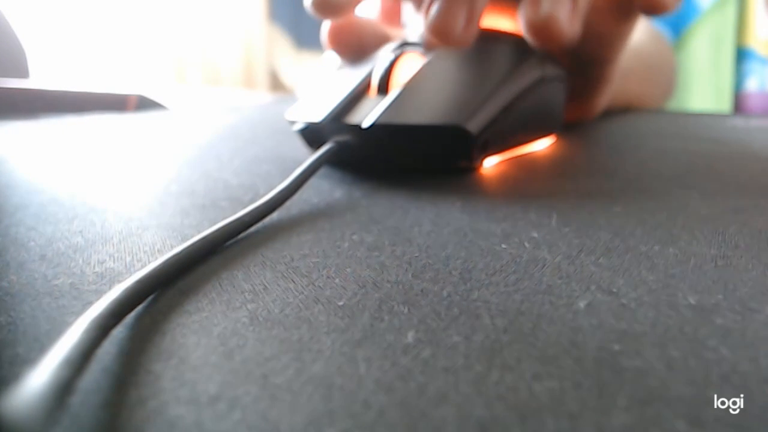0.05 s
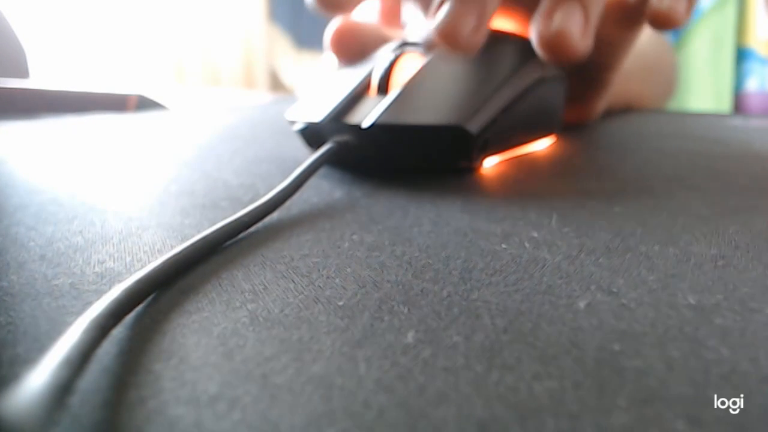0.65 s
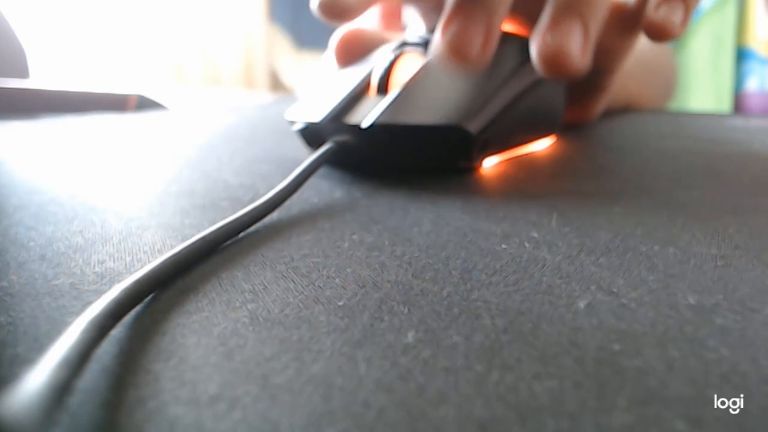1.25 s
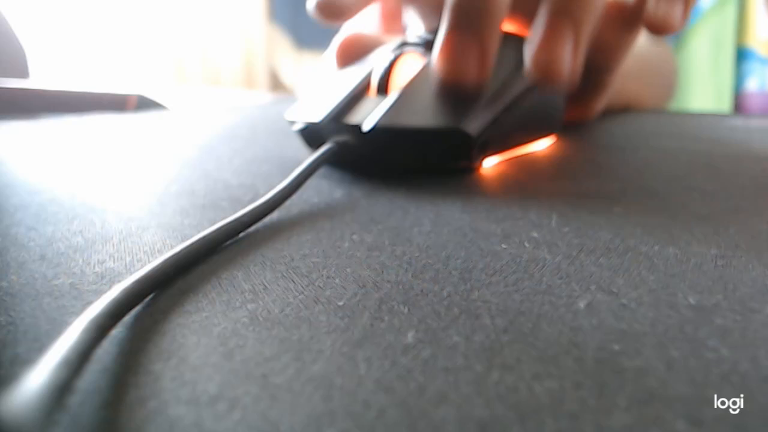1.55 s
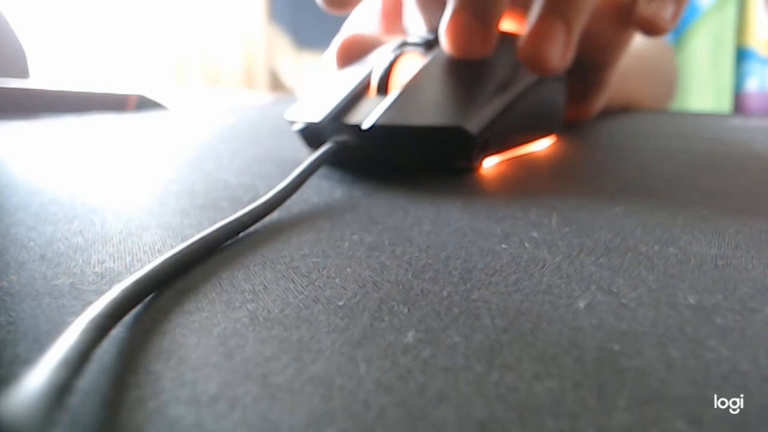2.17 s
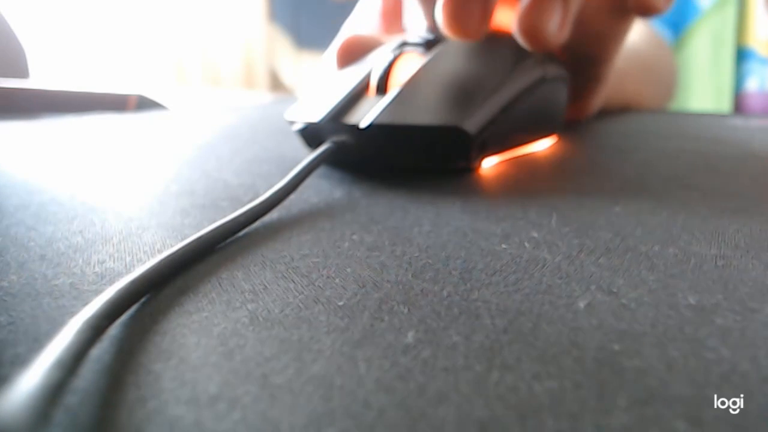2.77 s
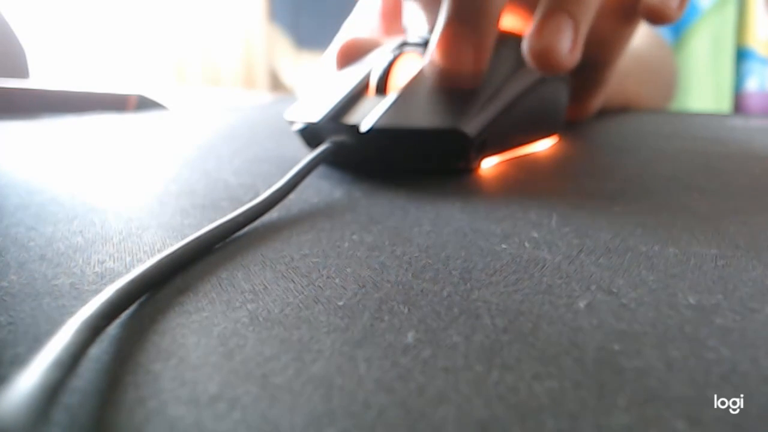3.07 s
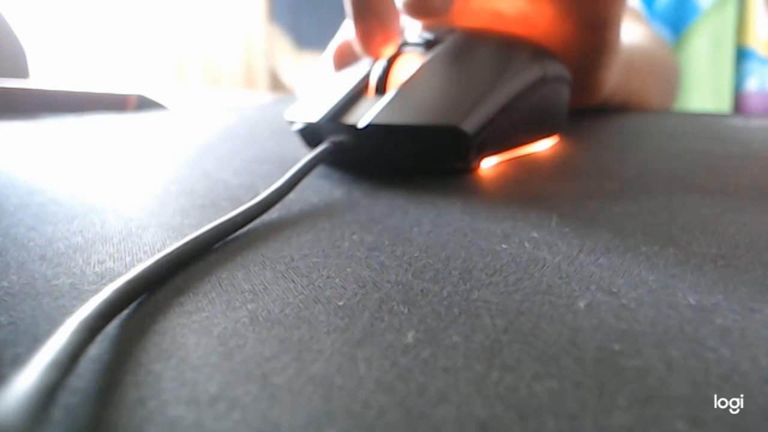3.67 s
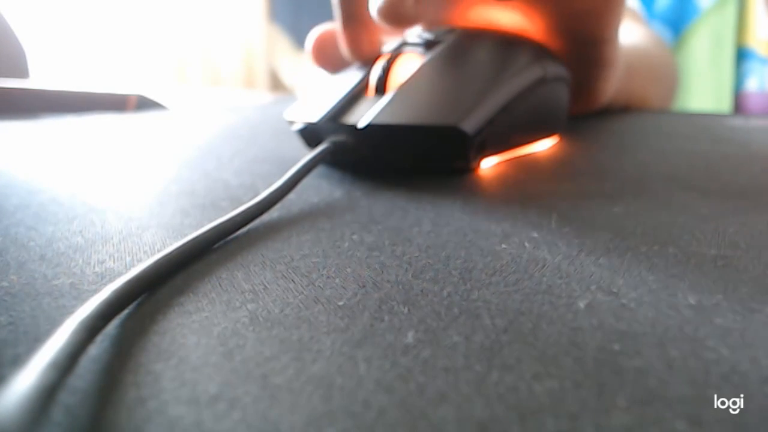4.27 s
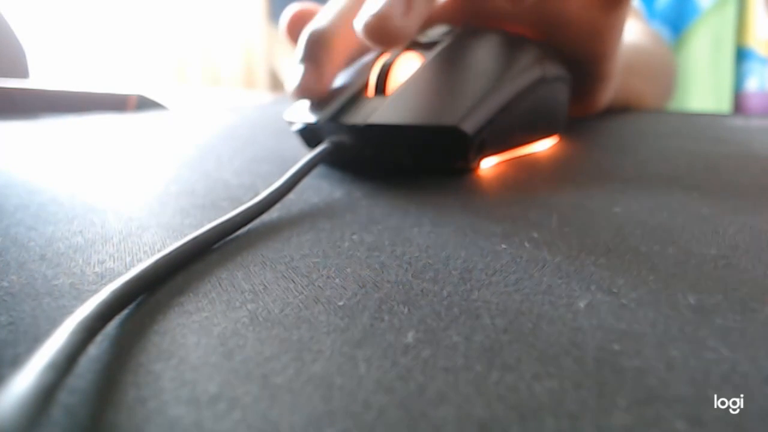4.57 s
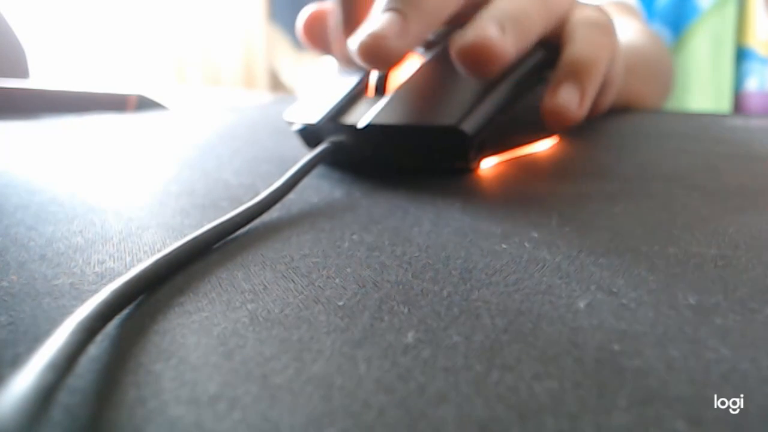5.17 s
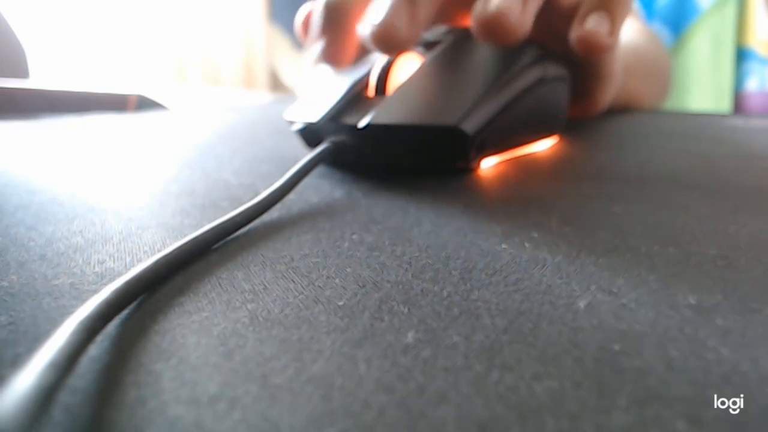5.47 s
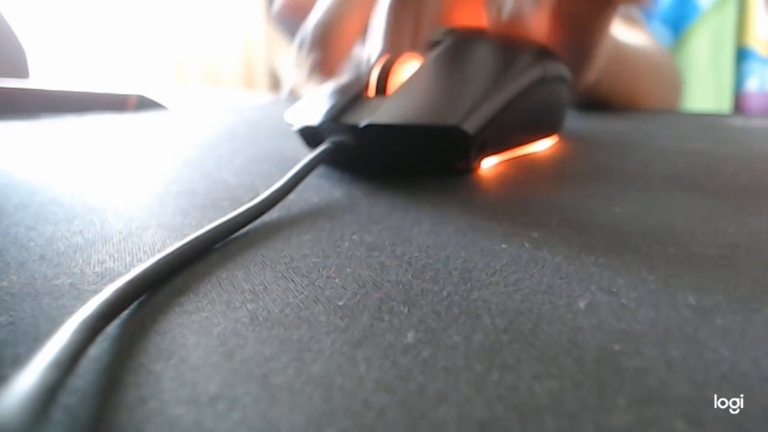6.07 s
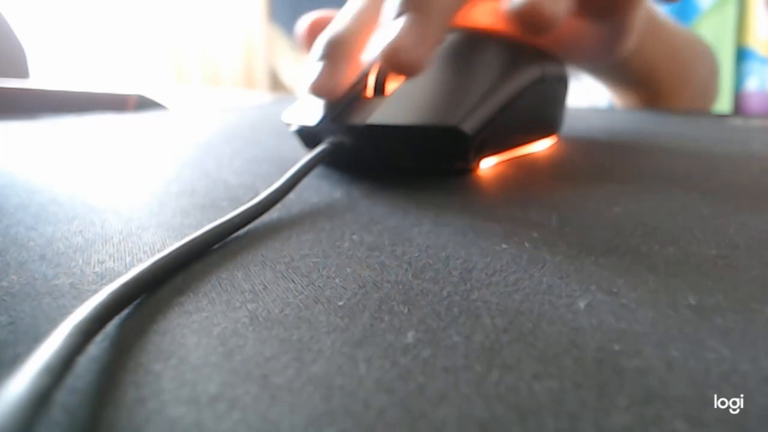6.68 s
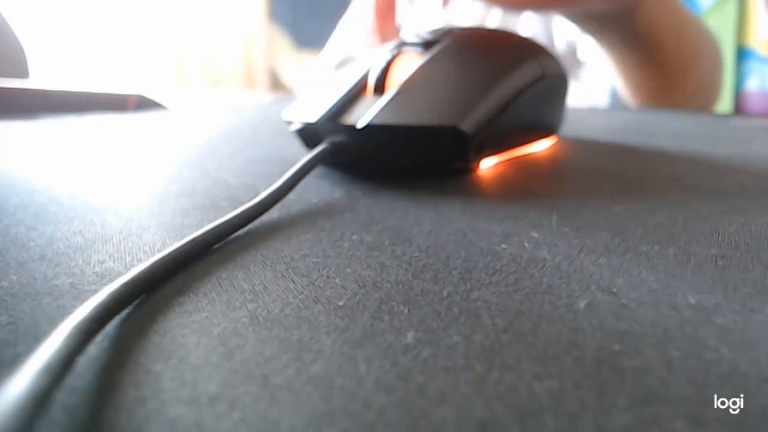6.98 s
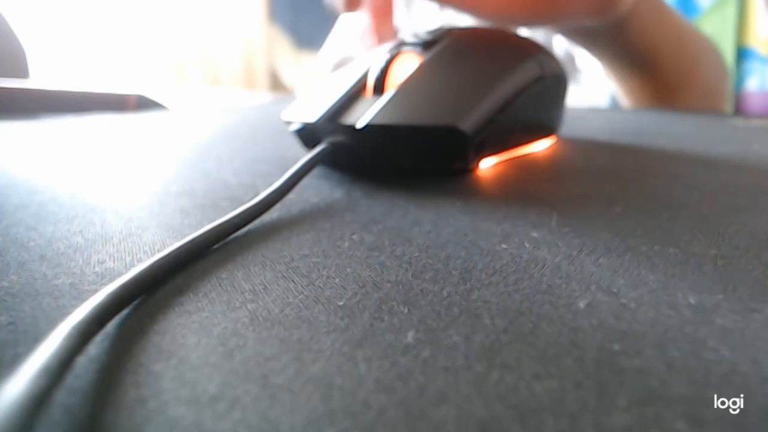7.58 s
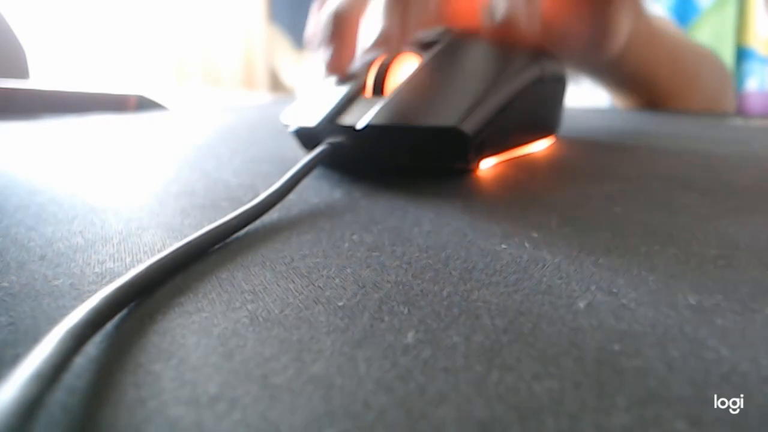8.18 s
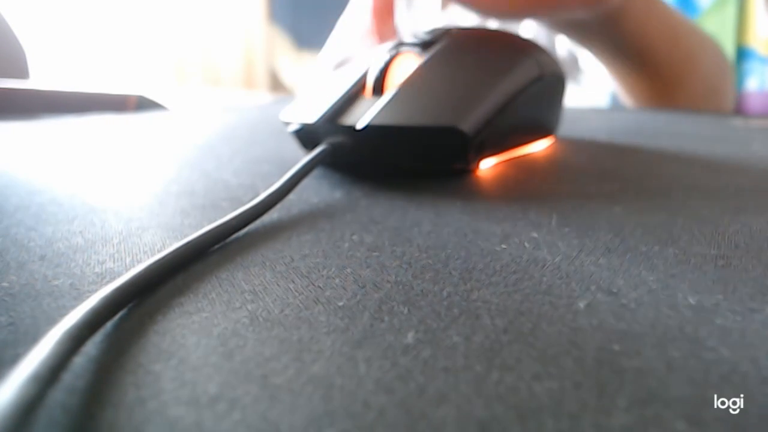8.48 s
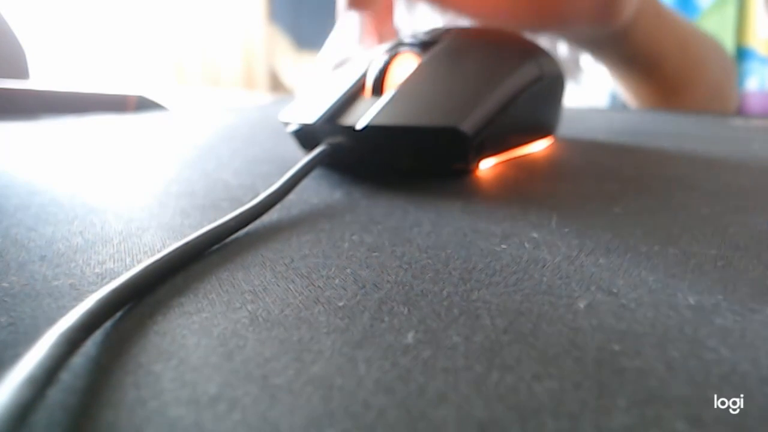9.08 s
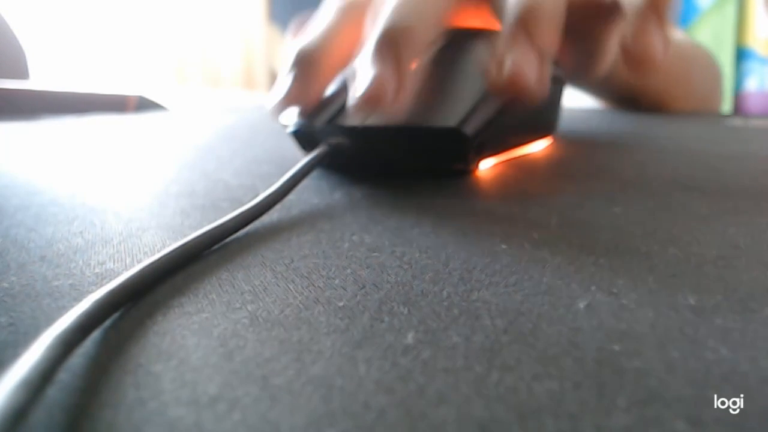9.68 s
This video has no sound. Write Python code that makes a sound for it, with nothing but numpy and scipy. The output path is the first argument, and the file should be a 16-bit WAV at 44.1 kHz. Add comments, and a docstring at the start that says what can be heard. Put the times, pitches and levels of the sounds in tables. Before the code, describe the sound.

A computer mouse is clicked on a padded desk, close to the microphone, over the faint hum of a small room. Each burst lasts about a tenth to a quarter of a second: a light switch click, a few hard plastic clacks with dull desk thumps, the stutter of a dragging fingertip, then the button springing back. Bursts come at about 0.3, 0.9, 1.5, 2.3 and 3 seconds, the last two the loudest. The tone then shifts slightly on the other button, with softer bursts at 3.8 and 4.4 seconds and only light ticks and a low finger rub near 5.1. A strong burst at 6 seconds starts a steadier run, at roughly 6.5, 7.1, 8.1, 8.6, 9.1 and 9.5, with soft taps around 7.7. Between bursts, skin faintly brushes the plastic and the desk rumbles softly. The clicking ends near 9.7 seconds.

```python
"""A small room hums quietly; then fingers work the buttons of a computer mouse on a padded desk.
In a typical burst a light press trips the switch, a few hard blows land, the finger sticks and slips,
and the button springs back. Each contact excites the modes of desk, body, shell, switch and spring.
Between bursts skin brushes the plastic and the arm makes the desk rumble. At 3.4 s the hand moves to
the second button, which favours other resonances; the last of sixteen bursts ends near 9.7 s."""
import sys
import numpy as np
from scipy import signal
from scipy.fft import rfft, irfft, next_fast_len
from scipy.io import wavfile
from scipy.ndimage import uniform_filter1d, map_coordinates

SR = 44100
rng = np.random.default_rng(int(sys.argv[2]) if len(sys.argv) > 2 else 0)


def log_audio(samples):
    """Write samples as a 16-bit WAV file to the path given in sys.argv[1]."""
    # one column per channel
    frames = np.atleast_2d(samples).T
    # limit to full scale, then quantise
    limited = np.clip(frames, -1, 1)
    pcm = np.round(limited * 32767).astype(np.int16)
    wavfile.write(sys.argv[1], SR, pcm)


N = 438354
THUD_T, CLICK_T = np.arange(SR // 5) / SR, np.arange(SR // 10) / SR  # time axes, t/s
BUTTON_CHANGE_S, SECOND_KNOCK_DB = 3.4, 7  # the second button rocks the body more on slip and release
MEDIUM_CLACK_DB = -28.5

# Spectra of room air, desk rumble, brushing skin and rubbing fingertip: f/Hz, relative density/dB
AIR_SPECTRUM = [(40, -23.5), (80, -9), (114, -3.5), (210, -14), (480, -12), (860, -19.5), (1300, -32.5),
                (2000, -38.5), (4000, -48), (8000, -53.5), (16000, -57.5)]
RUMBLE_SPECTRUM = [(15, -10.5), (30, -9), (52, 8), (72, -12), (110, -1.5), (200, -36), (500, -62.5),
                   (2000, -120)]
BRUSH_SPECTRUM = [(900, -18), (2000, 2), (2900, -11), (4000, 6), (5200, -16.5), (7000, -15), (9000, -22),
                  (16000, -21)]
RUB_SPECTRUM = [(70, -21), (130, -4.5), (190, -21), (255, 5), (380, -15.5), (700, -25), (1300, -39),
                (2400, -41.5), (3200, -47), (8000, -57), (16000, -60.5)]
# The computer's hum and whine: f/Hz, level/dB
HUM_TONES = [(54, -75.5), (108, -76.5), (1200, -90), (1400, -94.5)]
# Reverberation time of the room: f/Hz, T60/s
ROOM_DECAY = [(120, 0.29), (500, 0.48), (1500, 0.21), (4000, 0.28), (12000, 0.093)]
# The arm shifts its weight, the hand brushes the shell, a fingertip rubs: t/s, duration/s, level/dB
ARM_SHIFTS = [(0.02, 0.061, -64), (0.97, .05, -52), (4.2, 0.017, -59), (4.55, 0.32, -67),
              (5.15, 0.1, -63.5), (5.79, .02, -51.5), (6.74, 0.017, -58), (7.28, 0.098, -49),
              (7.62, 0.024, -55.5), (9.59, 0.088, -58.5)]
BRUSHES = [(0.01, .05, -86), (0.53, 0.09, -74), (1.17, 0.072, -78), (1.8, 0.12, -78), (2.59, 0.045, -76.5),
           (3.22, 0.016, -73), (3.95, 0.039, -87), (4.6, 0.054, -84.5), (5.41, 0.11, -67.5)]
RUBS = [(1.14, 0.092, -59.5), (2.41, 0.074, -42.5), (5.08, 0.196, -47.5), (6.55, 0.053, -39)]

# Low modes of the desk and of the mouse body on its pad: f/Hz, relative level/dB, T60/s
DESK_MODES = [(124.1, 11, 0.14), (143, -8, 0.26), (158.54, 0.5, 0.23), (185, -17.5, 0.5)]
BODY_MODES = [(238.3, 5, 0.081), (260.67, 10, 0.083), (291, -3, 0.11), (383, -23.5, 0.19)]
# Resonances of shell, switch housing and leaf spring; each wide last row is the contact's dry crack:
# f/Hz, bandwidth/Hz, relative level/dB, gain in the ring/dB, gain on the second button/dB
SHELL_MODES = [(404, 26, -1, 7, 3), (667, 27, 9.5, -5, 3.5), (793, 69, 0.5, 1, -1), (984, 72, -3, -1, 2),
               (1151, 42, -5.5, 5.5, 1), (1350, 230, -9, 0.5, 1), (1590, 57, -5.5, 6, 1),
               (1680, 130, -4.5, -5, -8), (1815, 44, -1, -6, -1.5), (1916, 32, -6, -6.5, -14),
               (2364, 130, -7.5, 0, 3), (1680, 810, -12, -27.5, -1)]
SWITCH_MODES = [(2990, 180, -4.5, 3, 1), (3717, 270, 5, -2, -6.5), (4030, 330, -5.5, -4.5, -9.5),
                (4566, 200, -6, -0.5, -0.5), (3810, 940, -7.5, -27.5, -2.5)]
SPRING_MODES = [(5343, 520, -0.5, 2.5, -3.5), (5900, 600, 0.5, 0, -3.2), (7130, 320, -2, 5, 0),
                (10910, 1200, -12.5, 7, -2.2), (14700, 1200, -23.5, 0.5, 1.5),
                (6366, 1400, 0.5, -26.5, -8.5)]

# A finger lands hard on a button: t/s, shell clack/dB, desk thump/dB, body knock/dB
BLOWS = [(0.309, -25.5, -22.5, -31), (0.334, -22, -14.5, -32.5), (0.356, -33, -22.5, -27.5),
         (0.385, -30.5, -31, -47.5), (0.898, -39, -32.5, -32.5), (0.926, -24.5, -17, -24.5),
         (0.95, -26.5, -17, -26.5), (0.975, -42.5, -22, -40), (0.997, -33.5, -42, -35.5),
         (1.542, -23.5, -17.5, -24.5), (1.567, -29.5, -19, -29.5), (1.612, -37.5, -41, -33),
         (2.314, -18.5, -15, -16), (2.339, -20, -13, -19.5), (2.359, -35.5, -26, -30.5),
         (3.018, -18.5, -19.5, -17), (3.042, -23, -14, -23), (3.063, -32, -39.5, -34.5),
         (3.108, -35.5, -30, -35.5), (3.787, -34, -23.5, -34.5), (3.815, -35, -58, -34),
         (4.384, -43.5, -28.5, -30.5), (4.433, -38, -30, -36), (4.463, -39, -47, -34.5),
         (6.007, -27.5, -26.5, -25.5), (6.03, -21.5, -13, -22.5), (6.043, -27, -32.5, -25.5),
         (6.056, -32, -15.5, -22.5), (6.497, -38.5, -25, -32), (6.526, -40, -32, -21.5),
         (6.576, -43, -39, -33.5), (7.125, -47.5, -26.5, -29.5), (7.182, -36, -23.5, -29.5),
         (8.099, -33, -18, -26.5), (8.114, -23.5, -28.5, -29), (8.125, -27.5, -15, -25.5),
         (8.663, -27, -34, -22), (9.05, -41, -24.5, -27), (9.125, -28, -35.5, -25.5),
         (9.167, -43.5, -30.5, -33), (9.544, -27, -39, -23.5), (9.571, -30, -19.5, -21.5)]
# Switch snap and spring ping in a blow: level at a medium clack/dB, slope/(dB per dB of clack)
BLOW_RESPONSE = [(-40, 0.74), (-43, .35)]
# The finger drags down the button, sticking and slipping: t/s, duration/s, level/dB
STROKES = [(0.323, .05, -42), (0.915, .07, -43.5), (1.531, .09, -37.5), (2.312, .05, -37),
           (3.032, .075, -39), (3.781, .075, -42), (4.424, .04, -42), (6.052, .03, -41), (6.537, .04, -43),
           (7.162, .03, -42.5), (8.109, .03, -38), (9.103, .06, -40.5), (9.55, .05, -44.5)]
# Light presses that trip the switch, the button springing back, soft touches: t/s, level/dB
PRESSES = [(0.869, -46), (0.893, -37.5), (1.514, -42), (2.19, -44), (2.303, -39), (2.919, -46),
           (3.006, -41.5), (3.724, -46.5), (4.365, -48.5), (5.124, -48), (5.995, -41), (7.136, -42.5),
           (8.068, -48), (8.079, -40.5), (8.574, -50), (8.583, -40), (8.609, -42), (9.027, -44),
           (9.037, -42), (9.527, -44.5)]
RELEASES = [(0.399, -36.5), (0.428, -46.5), (1.04, -38), (1.656, -36.5), (2.494, -37), (5.249, -44.5),
            (6.114, -43), (6.683, -42), (7.287, -43), (8.228, -44.5), (9.218, -42), (9.654, -42.5)]
TOUCHES = [(0.21, -60.5), (0.297, -46.5), (1.075, -40), (1.188, -64), (1.704, -41.5), (3.135, -37.5),
           (3.576, -58.5), (3.716, -43.5), (3.755, -33.5), (5.058, -45), (6.46, -43.5), (6.48, -35.5),
           (7.108, -41.5), (7.589, -45), (7.629, -48), (7.718, -39.5), (8.702, -34.5)]
# Gains by which each kind of contact shares its force: desk/dB, body/dB, shell/dB, switch/dB, spring/dB
SLIP_SHARES = (7.5, 4.5, -2, -4.5, -1)
PRESS_SHARES = (8.5, 7, -7, -2, -3)
RELEASE_SHARES = (4.5, 0.5, -3, -7.5, -2.5)
TOUCH_SHARES = (0.5, -2.5, -10, -28, -38.5)

# Lead of the left microphone port over the right: f/Hz, phase/rad
PORT_LEAD = [(100, 6.5), (700, -1.38), (1000, 0.73), (1640, 5), (2330, 4.5), (4480, 8), (7240, 12),
             (12000, 15.5), (16000, 19)]
# Response common to both ports, and that of the left relative to the right: f/Hz, gain/dB
PORT_RESPONSE = [(100, 0), (300, 0.5), (360, -5), (425, 1), (520, -3), (7400, 2), (8600, -6.5), (10900, -3),
                 (12200, -2), (15500, -3.5)]
PORT_BALANCE = [(60, -2.5), (380, -2.5), (650, -4), (1300, 0.5), (2400, 2.5), (4400, -4.5), (8000, -0.5),
                (15000, -2.5)]


def amp(db):
    """Amplitude ratio: a factor of ten per 20 dB."""
    return 10 ** (np.asarray(db) / 20)


def unit_rms(x):
    """Power normalisation to rms 1."""
    return x / np.sqrt(np.mean(x ** 2) + 1e-20)


def unit_energy(x):
    """Energy normalisation: each row carries as much as 10 ms at rms 1."""
    return x / np.sqrt(np.sum(x ** 2, axis=-1, keepdims=True) / (.01 * SR) + 1e-20)


def along(points, hz):
    """Interpolation of (f/Hz, value) points on a logarithmic frequency axis."""
    f, value = np.transpose(points)
    return np.interp(np.log(hz + 1), np.log(f + 1), value)


def filtered(x, response):
    """Linear filtering: the spectrum is multiplied by a frequency response."""
    size = next_fast_len(x.shape[-1] + SR // 50, real=True)
    return irfft(rfft(x, size) * response(np.fft.rfftfreq(size, 1 / SR)), size)[..., :x.shape[-1]]


def high_pass(x, hz, order):
    """Causal attenuation of the bass."""
    return signal.sosfilt(signal.butter(order, hz, 'high', fs=SR, output='sos'), x)


def add(track, start_s, sound):
    """Superposition of a sound on the track."""
    part = track[:, round(start_s * SR):][:, :sound.shape[-1]]
    part += sound[..., :part.shape[1]]


def noise(spectrum, apart, patchy_db):
    """Partly coherent stereo noise of rms 1, patchy in time and frequency; apart weighs the unshared."""
    white = rng.standard_normal(N) + apart * rng.standard_normal((2, N))
    bins = signal.stft(white, nperseg=1024)[2]
    patches = uniform_filter1d(rng.standard_normal(bins.shape[1:]), size=4, axis=0)
    patches = unit_rms(uniform_filter1d(patches, size=12, axis=1))
    patchy = signal.istft(bins * amp(patchy_db * patches), nperseg=1024)[1][:, :N]
    return unit_rms(filtered(patchy, lambda hz: amp(along(spectrum, hz))))


def swells(rows, rise_db_per_s, fall_db_per_s):
    """Power summation of envelopes that rise exponentially, hold and decay."""
    t = np.arange(0, N / SR, .002)
    start, length, db = np.transpose(rows)[:, :, None]
    before, after = np.maximum(start - t, 0), np.maximum(t - start - length, 0)
    gain = amp(db - rise_db_per_s * before - fall_db_per_s * after)
    return np.interp(np.arange(N) / SR, t, np.linalg.norm(gain, axis=0))


def room_tone():
    """Line spectrum over a continuous one: the computer's hum in the noise of the room air."""
    t = np.arange(N) / SR
    hum = sum(amp(db) * np.sqrt(2) * np.sin(2 * np.pi * (hz * t + rng.random())) for hz, db in HUM_TONES)
    return hum + amp(-68) * noise(AIR_SPECTRUM, apart=.4, patchy_db=3)


def desk_rumble(resting_db=-72, rock_s=.016, rock_db=-58.5, wobble_db=5, wobbles_per_s=9):
    """Forced vibration: the desk's wavering rumble swells under each arm shift and blow."""
    pushes = list(ARM_SHIFTS) + [(start, rock_s, rock_db) for start, *_ in BLOWS]
    weight = amp(resting_db) + swells(pushes, rise_db_per_s=260.5, fall_db_per_s=130)
    rumble = noise(RUMBLE_SPECTRUM, apart=.11, patchy_db=0)
    position = np.arange(N) / SR * wobbles_per_s
    wobble = map_coordinates(rng.standard_normal(int(position[-1]) + 2), [position])
    return weight * amp(wobble_db * wobble) * rumble


def reverberation(x, coherent_below_hz=900):
    """Diffuse field: reflections decay exponentially and reach both ports alike in the bass."""
    hz, t, bins = signal.stft(rng.standard_normal((3, SR // 2)), SR, nperseg=256)
    apart = hz[:, None] / coherent_below_hz
    field = (bins[0] + apart * bins[1:]) / np.hypot(1, apart)
    decay = amp(-60 * t / along(ROOM_DECAY, hz)[:, None])
    tail = signal.istft(field * decay, SR, nperseg=256)[1]
    delayed = np.pad(x, ((0, 0), (SR // 100, 0)))
    return signal.fftconvolve(delayed, tail / np.linalg.norm(tail[0]), axes=1)[:, :N]


def skin_friction():
    """Sliding friction on matt plastic: a faint hiss under light load, a low rub under pressure."""
    hiss = noise(BRUSH_SPECTRUM, apart=.32, patchy_db=5)
    hiss *= swells(BRUSHES, rise_db_per_s=228.5, fall_db_per_s=289)
    rub = noise(RUB_SPECTRUM, apart=.11, patchy_db=5.5)
    rub *= swells(RUBS, rise_db_per_s=452, fall_db_per_s=601)
    return hiss + rub


def slips(period_s=.0145, jitter_s=.0025, scatter_db=2, fade_db_per_s=25):
    """Stick-slip motion: nearly periodic slips that weaken along a stroke. Rows: t/s, level/dB."""
    grid = [(start, t, db) for start, length, db in STROKES for t in np.arange(0, length, period_s)]
    start, elapsed, db = np.transpose(grid)
    lateness, strength = rng.standard_normal((len(grid), 2)).T
    times = start + elapsed + jitter_s * lateness * (elapsed > 0)
    levels = db - fade_db_per_s * elapsed + scatter_db * strength
    return np.transpose([times, levels])


def finger_contacts():
    """Division of force among the parts. Rows: t/s, thump/dB, knock/dB, clack/dB, snap/dB, ping/dB."""
    rows = []
    for start, clack, thump, knock in BLOWS:
        snap, ping = (db + slope * (clack - MEDIUM_CLACK_DB) for db, slope in BLOW_RESPONSE)
        rows.append((start, thump, knock, clack, snap, ping))
    kinds = [(PRESSES, PRESS_SHARES, 0), (TOUCHES, TOUCH_SHARES, 0),
             (RELEASES, RELEASE_SHARES, SECOND_KNOCK_DB), (slips(), SLIP_SHARES, SECOND_KNOCK_DB)]
    for events, shares, second_db in kinds:
        for start, db in events:
            thump, knock, clack, snap, ping = np.add(db, shares)
            knock += second_db * (start > BUTTON_CHANGE_S)
            rows.append((start, thump, knock, clack, snap, ping))
    return np.array(rows)


def excitation(contacts, contact_t60, ring_t60, apart, slide_t60=.03, slide_rise_s=.0045, trip_db=-63):
    """Impact excitation: a brief chatter coherent at both ports, then a partly coherent diffuse ring."""
    t = CLICK_T
    # a touch too light to trip the switch is a slide of skin: it swells softly and lasts longer
    sliding = 1 / (1 + amp(contacts[:, -1:] - trip_db) ** 2)
    swell = 1 - np.exp(-t / (slide_rise_s * sliding + 1e-6))
    chatter_envelope = unit_energy(swell * amp(-60 * t / (contact_t60 + slide_t60 * sliding)))
    build_up = (1 - np.exp(-t / .0015)) ** 2
    ring_envelope = unit_energy(swell * amp(-60 * t / ring_t60) * build_up)
    white = rng.standard_normal((len(contacts), 4, len(t)))
    diffuse = (white[:, 1:2] + apart * white[:, 2:]) / np.hypot(1, apart)
    return white[:, :1] * chatter_envelope[:, None], diffuse * ring_envelope[:, None]


def thud(modes, attack_s, cut_hz):
    """Damped free vibration of heavy modes, set going by a soft fingertip."""
    t = THUD_T
    ring = sum(amp(db - 60 * t / t60) * np.sin(2 * np.pi * hz * t) for hz, db, t60 in modes)
    return high_pass(unit_energy(ring * (1 - np.exp(-t / attack_s))), cut_hz, order=6)


def clicks(contacts, modes, drive, ring_db, vary_db, tilt_db, cut_hz):
    """Resonance: the modes of one part filter chatter and ring into one equal-energy click a contact."""
    hz, width, db, lasting_db, second_db = np.transpose(modes)
    start, _, _, clack_db, _, _ = contacts.T[:, :, None]
    # each button and each spot on it favours other resonances, and force tilts the spectrum
    spot_db = second_db * (start > BUTTON_CHANGE_S) + vary_db * rng.standard_normal((len(start), len(hz)))
    force = amp(clack_db - clack_db.max())
    chatter_gain = amp(db + spot_db + tilt_db * force * np.log2(hz / hz.mean()))
    ring_gain = chatter_gain * amp(ring_db + lasting_db)
    size = next_fast_len(len(CLICK_T) + SR // 50, real=True)
    f = np.fft.rfftfreq(size, 1 / SR)
    resonators = np.array([(-1) ** k * 1j * f * band / (centre ** 2 - f ** 2 + 1j * f * band)
                           for k, (centre, band) in enumerate(zip(hz, width))])
    chatter, ring = (rfft(x, size) for x in drive)
    spectrum = chatter * (chatter_gain @ resonators)[:, None] + ring * (ring_gain @ resonators)[:, None]
    port_phase = np.exp(-1j * np.array([[0], [1]]) * along(PORT_LEAD, f))
    sound = irfft(spectrum * port_phase, size)[..., :len(CLICK_T)]
    return unit_energy(high_pass(sound, cut_hz, order=4))


def mouse(ping_lag_s=.00091):
    """Modal superposition: a contact sounds desk, body, shell and switch, and just after, the spring."""
    contacts = finger_contacts()
    desk = thud(DESK_MODES, attack_s=.002, cut_hz=125.3)
    body = thud(BODY_MODES, attack_s=.0069, cut_hz=105)
    drive = excitation(contacts, contact_t60=.0053, ring_t60=.098, apart=.77)
    clacks = clicks(contacts, SHELL_MODES, drive, ring_db=0, vary_db=3, tilt_db=1.5, cut_hz=540)
    drive = excitation(contacts, contact_t60=.006, ring_t60=.049, apart=2)
    snaps = clicks(contacts, SWITCH_MODES, drive, ring_db=-2, vary_db=4, tilt_db=-1.5, cut_hz=3700)
    drive = excitation(contacts, contact_t60=.012, ring_t60=.056, apart=2.4)
    pings = clicks(contacts, SPRING_MODES, drive, ring_db=-1, vary_db=2.5, tilt_db=-6.5, cut_hz=4400)
    track = np.zeros((2, N))
    for contact, shell, switch, spring in zip(contacts, clacks, snaps, pings):
        start, thump, knock, clack, snap, ping = contact
        add(track, start, amp(thump) * desk + amp(knock) * body)
        add(track, start, amp(clack) * shell + amp(snap) * switch)
        add(track, start + ping_lag_s, amp(ping) * spring)
    return track


def scene():
    """Direct and reverberant fields: close to the mouse, its direct sound dominates the quiet room."""
    direct = mouse()
    return direct + amp(-27) * reverberation(direct) + skin_friction() + room_tone() + desk_rumble()


def record(dry, top_hz=15850):
    """Frequency response: each microphone port has its own colour, and both share one band limit."""
    def response(hz):
        sides = np.array([[.5], [-.5]])
        colour = amp(along(PORT_RESPONSE, hz) + sides * along(PORT_BALANCE, hz))
        band_limit = .5 - .5 * np.tanh((hz - top_hz) / 150)
        return colour * band_limit
    return filtered(dry, response)


dry = scene()
out = record(dry)
log_audio(out)
```